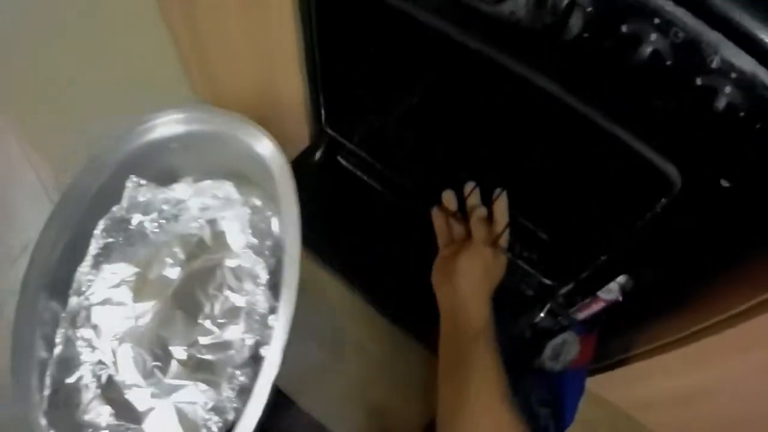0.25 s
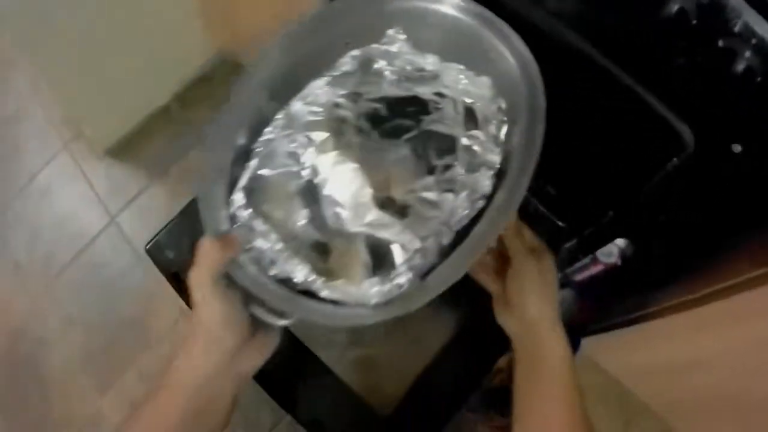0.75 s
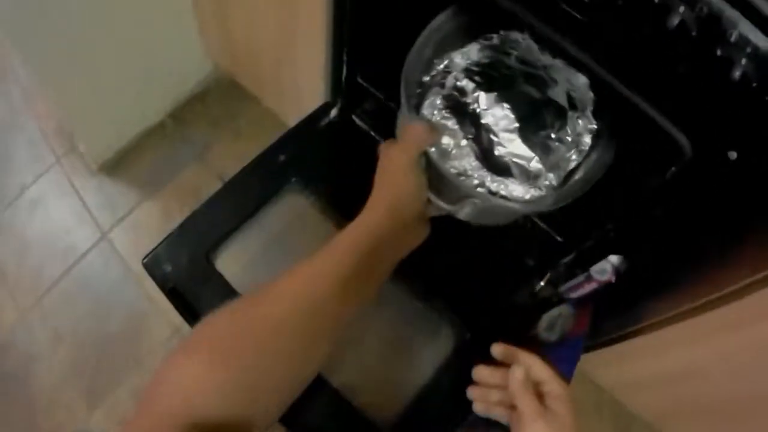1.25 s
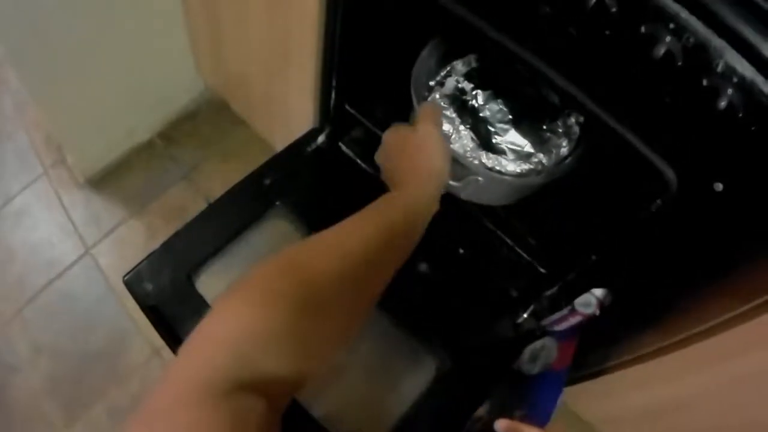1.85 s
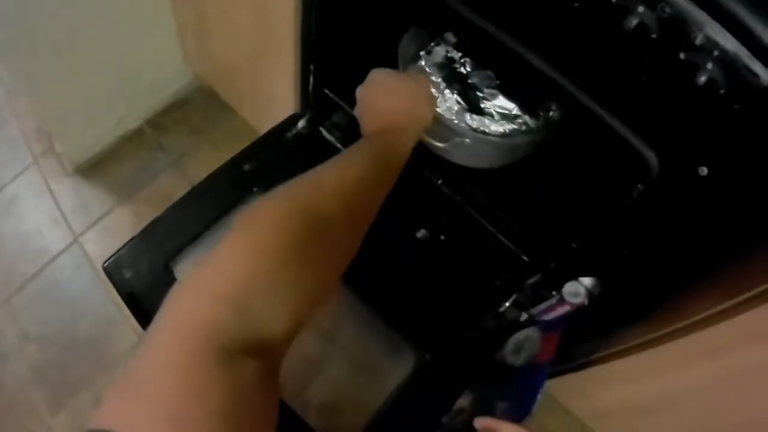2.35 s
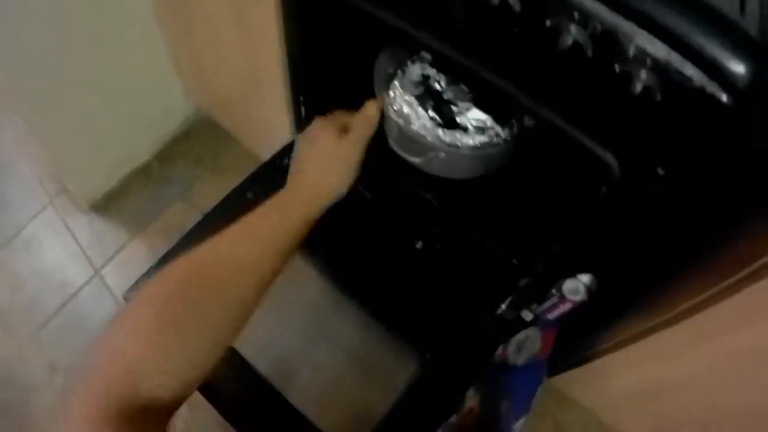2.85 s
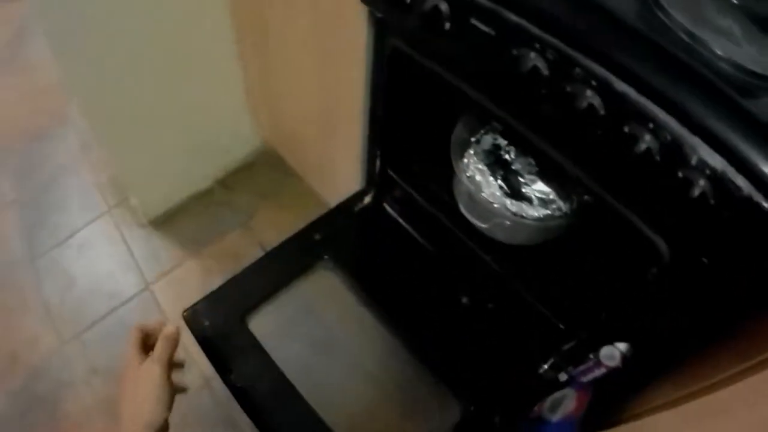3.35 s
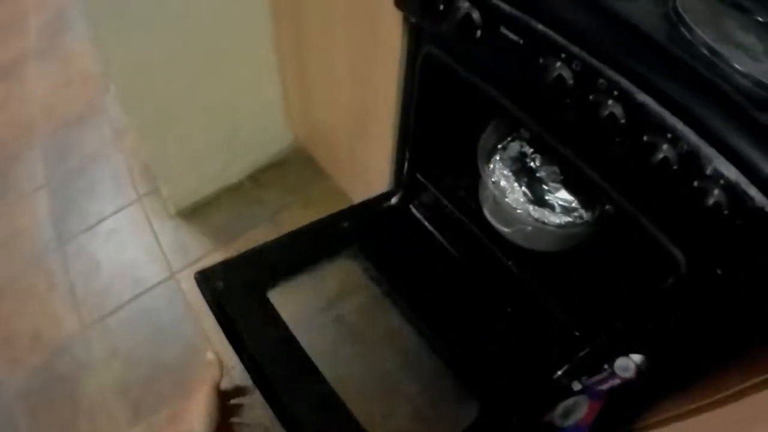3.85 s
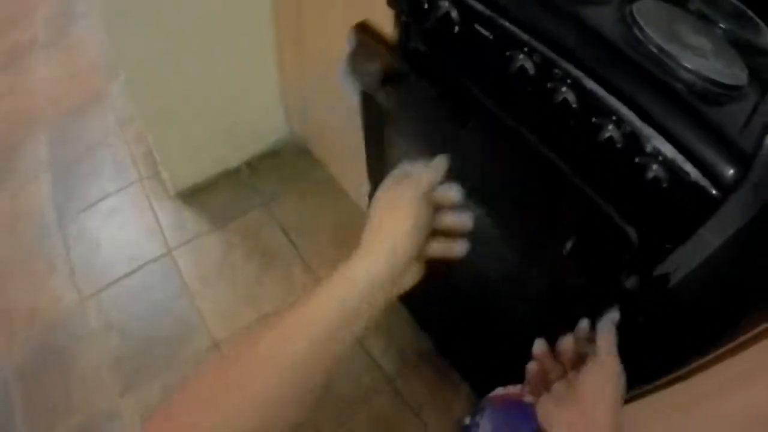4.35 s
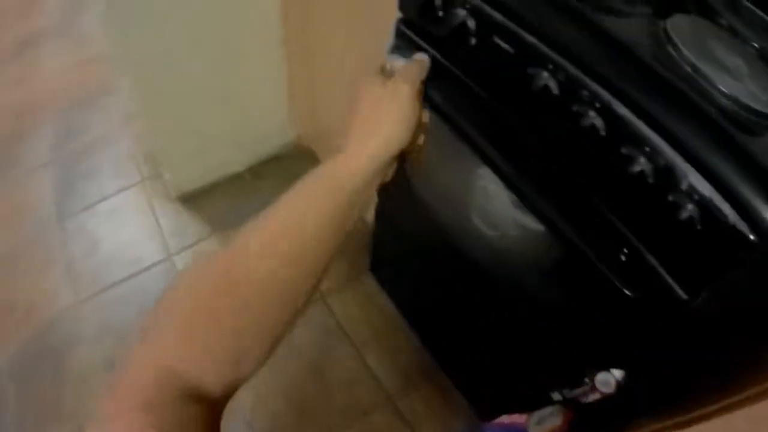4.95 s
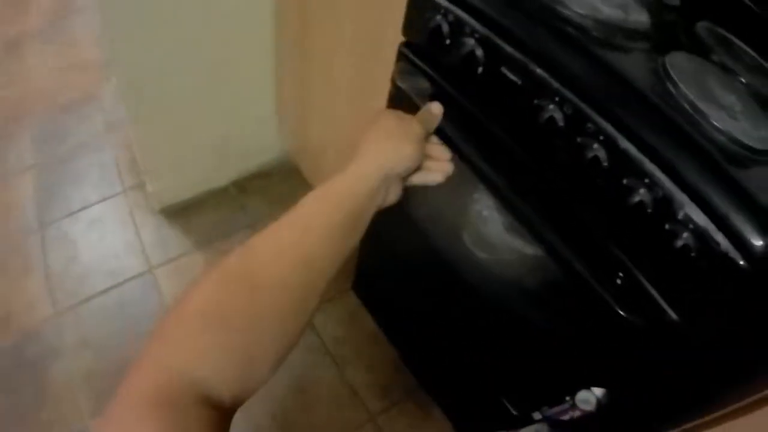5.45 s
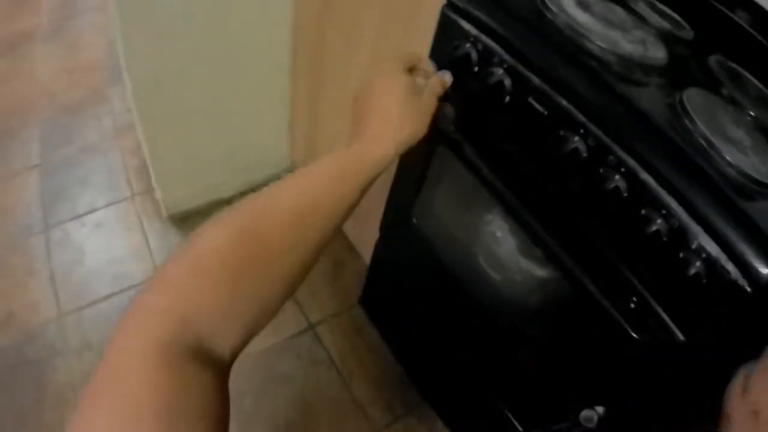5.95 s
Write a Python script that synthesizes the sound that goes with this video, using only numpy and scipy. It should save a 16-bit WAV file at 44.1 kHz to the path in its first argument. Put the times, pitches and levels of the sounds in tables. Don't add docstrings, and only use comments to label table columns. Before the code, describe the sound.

A metal rack clatters to rest, then a thin roasting dish rings as it lands, scraping and bumping against the oven wall. Light taps and a near-quiet gap follow. A high wavering hinge squeak leads into a heavy door slam, by far the loudest sound, with rattling panels and short hard echoes. Small rubs and ticks trail off over room air and faint hum, captured by a small close microphone.

```python
import sys
import numpy as np
from scipy import signal
from scipy.fft import rfft, irfft
from scipy.io import wavfile
from scipy.ndimage import uniform_filter1d

SR = 44100
rng = np.random.default_rng(int(sys.argv[2]) if len(sys.argv) > 2 else 0)


def voltage_ratio(level):
    return 10 ** (np.asarray(level, float) / 20)


def transcribe(signal):
    frames = np.atleast_2d(signal).T
    limited = np.clip(frames, -1, 1)
    pcm = np.round(limited * 32767).astype(np.int16)
    wavfile.write(sys.argv[1], SR, pcm)


N = 273464


def evened(x):
    return x / np.sqrt(np.mean(x ** 2) + 1e-20)


def read(points, hz):
    f, value = np.transpose(points)
    return np.interp(np.log(hz + 1), np.log(f + 1), value)


def add(mix, s, sound):
    part = mix[max(round(s * SR), 0):][:len(sound)]
    part += sound[:len(part)]


def coloured(x, gain):
    return irfft(rfft(x) * gain(np.fft.rfftfreq(len(x), 1 / SR)), len(x))


def resonance(hz, centre_hz, width_hz):
    return 1 / (1 + ((hz - centre_hz) / (width_hz / 2)) ** 2)


def band(hz, centre_hz, octaves):
    return np.exp(-.5 * (np.log2((hz + 1) / centre_hz) / octaves) ** 2)


def wander(count, hz):
    noise = uniform_filter1d(rng.standard_normal(count), 40)
    return evened(signal.lfilter([1], [1, -np.exp(-2 * np.pi * hz / SR)], noise))


def hum():
    # (frequency [Hz], density [dB per Hz])
    air = [(25, 4.5), (50, 2.1), (100, 1), (200, -8.5), (350, -9.5), (550, -5.5), (900, -14.5),
           (1500, -20.5), (2200, -22.5), (4000, -26), (6500, -28), (10000, -27.5), (13500, -24.5),
           (14600, -36.5)]
    # (frequency [Hz], half width [Hz], level [dB])
    drone = [(282, 13, -73.5)]
    out = voltage_ratio(-69.5) * evened(coloured(rng.standard_normal(N), lambda hz: voltage_ratio(read(air, hz))))
    for f, half_width, db in drone:
        line = coloured(rng.standard_normal(N), lambda hz: resonance(hz, f, 2 * half_width))
        out = out + voltage_ratio(db) * evened(line)
    return out


def kitchen(x):
    # (frequency [Hz], t60 [s])
    decay = [(100, 0.29), (400, 0.29), (1500, 0.49), (4000, 0.51), (10000, 0.37)]
    taps = np.zeros(SR)
    at = np.arange(300, SR - 20, 20)
    taps[at + rng.integers(0, 20, len(at))] = rng.choice([-1., 1.], len(at))
    hz, t, z = signal.stft(taps, SR, nperseg=256)
    tail = signal.istft(z * voltage_ratio(-60 * t / read(decay, hz)[:, None]), SR, nperseg=256)[1]
    return signal.fftconvolve(x, tail / np.linalg.norm(tail))[:N]


def rubs():
    # (start [s], length [s], frequency [Hz], width [Hz], level [dB])
    touches = [(0.04, 0.048, 3700, 120, -52), (0.059, 0.059, 1430, 61.7, -44.5), (0.48, 0.3, 142, 91, -65),
               (1.84, 0.44, 138, 58, -61), (1.897, 0.32, 400, 90, -61), (2.1, 0.034, 1110, 91, -48),
               (2.083, 0.046, 4000, 250, -71), (2.853, 0.058, 1740, 514, -63),
               (2.852, 0.068, 4270, 800, -65), (2.95, 0.03, 2230, 900, -58), (2.904, 0.094, 4060, 300, -67),
               (2.922, 0.017, 550, 200, -53), (3.004, 0.12, 1370, 300, -65),
               (3.077, 0.12, 1525, 220, -63.5), (3.08, 0.077, 820, 70, -67), (3.395, 0.05, 1500, 450, -62),
               (4.941, 0.16, 1490, 98.7, -79), (5.035, 0.138, 537.4, 68.6, -69),
               (5.045, 0.2, 4080, 505, -79.5), (5.151, 0.0238, 1575, 301.5, -65.5),
               (2.453, 0.067, 1340, 30, -67), (5.22, 0.012, 3640, 309.7, -77), (5.24, 0.24, 1550, 201, -79),
               (5.477, 0.024, 1500, 295.7, -71)]
    out = np.zeros(N)
    for s, length, hz, width, db in touches:
        noise = rng.standard_normal(16384)
        fuzz = evened(coloured(noise, lambda f: resonance(f, hz, width)))[:round(length * SR)]
        u = np.linspace(0, 1, len(fuzz))
        add(out, s, voltage_ratio(db) * fuzz * 2 * np.sin(np.pi * u ** 0.3))
    return out


def ticks():
    # (time [s], frequency [Hz], level [dB], t60 [s])
    contacts = [(-.0012, 635, -13.5, 0.02), (.043, 2020, -32, 0.044), (.044, 700, -38, .05),
                (.098, 1464, -27.5, .05), (.196, 3720, -50, 0.14), (.198, 3410, -50, 0.15),
                (.27, 2150, -39, .03), (.2702, 945, -24, .025), (.272, 137, -35, 0.16),
                (1.5337, 900, -48, .05), (1.5374, 1100, -39, .05), (1.5443, 1680, -29, 0.015),
                (2.19, 900, -38, .02), (2.232, 1370, -38, 0.056), (2.255, 1300, -46, .04),
                (2.279, 1570, -40, 0.035), (2.342, 628, -30, .03), (2.5, 890, -46, 0.047),
                (2.38, 980, -42, 0.21), (2.395, 1880, -48, 0.38), (2.458, 1355, -49.5, 0.33),
                (2.513, 600, -47, 0.24), (4.036, 429, -37.5, .15), (2.346, 565, -35.5, .06),
                (2.194, 2400, -36, 0.012), (2.55, 1700, -53, .02), (2.558, 1600, -44.5, 0.028),
                (2.8542, 1690, -52, 0.025), (2.8538, 4350, -55, .02), (2.925, 1500, -44, .03),
                (2.9522, 2400, -42, 0.028), (2.968, 1870, -41, .02), (3.0284, 1500, -52, .03),
                (3.085, 1500, -45, .03), (3.1067, 1520, -48, .03), (3.473, 1500, -36.5, 0.023),
                (4.5183, 1500, -9, .02), (4.513, 3400, -45, .03), (4.531, 389, -6.5, 0.051),
                (4.545, 1435, -14, 0.034), (4.744, 1490, -33, 0.044), (4.956, 450, -44, .05),
                (5.0, 1500, -51, .1), (5.045, 550, -51, .04), (5.088, 532, -46.5, 0.035),
                (5.107, 545, -49.5, .05), (5.222, 1050, -57, .04)]
    rise_s = 0.36e-3
    out = np.zeros(N)
    for s, hz, db, t60 in contacts:
        t = np.arange(round(t60 * SR)) / SR - min(s, 0)
        envelope = voltage_ratio(db - 60 * t / t60) * (1 - np.exp(-t / rise_s))
        add(out, s, envelope * np.sin(2 * np.pi * hz * t))
    return out


def slide():
    # (start [s], length [s], level [dB], change over
    # stroke [dB], brightness [dB])
    strokes = [(0.0, 0.238, -35.5, -4.5, -17.5), (0.195, 0.49, -42, -26, -16),
               (0.578, 0.042, -62.5, 3, -29), (1.277, 0.29, -87, 4.5, -4.5),
               (1.624, 0.15, -59.5, -3, -20.5), (1.765, 0.29, -60, 7, -11),
               (2.093, 0.019, -52.5, -1.5, -7.5), (2.14, 0.043, -57, 1, -12), (2.196, 0.22, -45, -4, -12.5),
               (2.361, 0.21, -43.5, -13.5, -19.5), (2.62, 0.268, -71.5, -8, -15),
               (2.924, 0.036, -52.5, -7.5, -4.5), (3.05, 0.37, -59, -11, -11),
               (3.398, 0.05, -58.5, -3.5, -13), (3.487, 0.082, -49, -19, -14), (3.6, 0.63, -78.5, 1, -9.5),
               (4.05, 0.11, -49, -8, -14.5), (4.161, .32, -55.5, 0, -7.5), (4.591, 0.22, -30.5, -13.5, -16),
               (4.945, 0.069, -53, -0.5, -18), (5.041, 0.086, -61.5, 4, -8.5), (5.174, .36, -67, -2, -13)]
    # (frequency [Hz], density [dB per Hz])
    slip_colour = [(50, -1.5), (140, 3), (300, 3.5), (450, -4.5), (700, -4.5), (1100, -10.5), (1800, -11),
                   (2300, -17), (3000, -21.5), (4000, -23.5), (6000, -27), (8500, -30.5), (12000, -32.5),
                   (14500, -38.5)]
    # (frequency [Hz], width [Hz], level [dB])
    body_modes = [(400, 50, 5), (570, 60, 4), (800, 60, 3), (1450, 200, 5), (1800, 150, 4), (2650, 250, 3),
                  (3950, 600, 5)]
    rattle_db, small_modes_db, small_mode_hz = 1.8, 2.5, 22
    rise_db_per_s, fall_db_per_s, rest_db = 599.5, 261, -80.5
    treble_follows, treble_rest_db = 0.691, -89.5
    bass_follows, bass_rest_db, bass_smooth_ms = 0.49, -75, 40
    light_touch = 0.79

    slips = voltage_ratio(1.2 * np.minimum(rng.exponential(1, N), 5))
    slips = slips * (rng.random(N) < 2500 / SR) * rng.choice([-1, 1], N)
    drive = evened(slips) + 0.6 * rng.standard_normal(N)
    drive = drive * voltage_ratio(rattle_db * wander(N, 33))
    small = evened(uniform_filter1d(rng.standard_normal(N // 2 + 1), round(small_mode_hz * N / SR)))

    def colour(hz):
        body_db = sum(db * resonance(hz, f, w) for f, w, db in body_modes)
        return voltage_ratio(read(slip_colour, hz) + small_modes_db * small + body_db)

    def lows(hz, edge_hz):
        return 1 / (1 + (hz / edge_hz) ** 6)

    low = evened(coloured(drive, lambda hz: colour(hz) * lows(hz, 230)))
    mid = evened(coloured(drive, lambda hz: colour(hz) * (1 - lows(hz, 325)) * lows(hz, 2000)))
    high = evened(coloured(drive, lambda hz: colour(hz) * (1 - lows(hz, 2300))))

    t = np.arange(N) / SR
    grid_s = np.arange(0, t[-1], .001)
    s, length, db, change_db, bright_db = np.transpose(strokes)[..., None]
    before, after = np.minimum(grid_s - s, 0), np.maximum(grid_s - s - length, 0)
    edges_db = rise_db_per_s * before - fall_db_per_s * after
    along_db = change_db * np.clip((grid_s - s) / length, 0, 1)
    effort = voltage_ratio(rest_db) + voltage_ratio(db + edges_db + along_db).max(0)
    fizz = voltage_ratio(treble_rest_db) + voltage_ratio(db + bright_db + edges_db + treble_follows * along_db).max(0)
    weight_db = db - light_touch * (bright_db + 14.5) + edges_db + along_db
    weight = voltage_ratio(rest_db) + voltage_ratio(weight_db).max(0)
    rumble = uniform_filter1d((weight / voltage_ratio(rest_db)) ** bass_follows, 1 + bass_smooth_ms)
    rumble = voltage_ratio(bass_rest_db) * rumble
    return sum(x * np.interp(t, grid_s, gain) for x, gain in ((low, rumble), (mid, effort), (high, fizz)))


def strikes(hits, modes, clatter, rise_ms):
    # (frequency [Hz], t60 [s])
    clatter_t60 = [(60, 0.19), (250, 0.18), (1000, 0.14), (4000, 0.074), (12000, 0.18)]
    out, t = np.zeros((2, N)), np.arange(24576) / SR
    hz = np.fft.rfftfreq(len(t), 1 / SR)
    centres = np.geomspace(60, 12000, 8)
    shares = np.array([band(hz, c, .4) for c in centres])
    shares /= shares.sum(0)
    rise = 1 - np.exp(-t[None] / (rise_ms / 1000 + 0.35 / centres[:, None]))
    fade = np.clip((t[-1] - t) / .1, 0, 1)
    for s, db, ring_db, tilt_db, damping in hits:
        noise, luck = rng.standard_normal(len(t)), rng.standard_normal((30, 2))
        gain = voltage_ratio(read(clatter, hz) + tilt_db * np.log2(hz / 700 + .02))
        parts = irfft(rfft(noise) * gain * shares, len(t))
        parts /= np.sqrt(np.mean(parts.sum(0) ** 2))
        decay = voltage_ratio(-60 * damping * t / read(clatter_t60, centres)[:, None])
        dense = (parts * rise * decay).sum(0)
        ring = 0
        for (f, level, t60), (a, b) in zip(modes, luck):
            mode_db = level + 0.24 * a + tilt_db * np.log2(f / 700) - 60 * damping * t / t60
            ring = ring + voltage_ratio(mode_db) * np.sin(2 * np.pi * f * (1 + .0007 * b) * t)
        add(out[0], s, voltage_ratio(db) * dense * fade)
        add(out[1], s, voltage_ratio(db + ring_db) * ring * rise[4] * fade)
    return out


def rack():
    # (time [s], peak [dB], ring of the modes [dB], brightness [dB per octave], damping [factor])
    hits = [
        (0.0, -19, -7, -0.5, 2.53),
        (0.041, -28, -6.5, -2, 0.61),
        (0.094, -35, -20, 0, 0.77),
        (0.2365, -29, 0.5, -2, 0.9),
        (0.2705, -23.5, -10.5, -4, 1.82),
        (3.4745, -35, -20, -1.5, 2.25),
    ]
    # (frequency [Hz], level [dB], t60 [s])
    modes = [(141, -6, 0.32), (517.7, -14, 0.19), (632, 7, 0.07), (735, -10.5, 0.21), (979, -6.5, 0.072),
             (1490, -14, 0.29), (700, 1.5, 0.035)]
    # (frequency [Hz], density [dB per Hz])
    clatter = [(50, -39), (140, -2), (300, -9.5), (450, -4.5), (700, 2), (1100, 1), (1800, -5), (2300, -15),
               (3000, -20), (4000, -20), (6000, -34), (8500, -40.5), (12000, -48.5), (14500, -55)]
    return strikes(hits, modes, clatter, rise_ms=0.72)


def dish():
    # (time [s], peak [dB], ring of the modes [dB], brightness [dB per octave], damping [factor])
    hits = [
        (1.541, -31.5, 3.5, -0.17, 1.01),
        (2.8538, -50.5, -8.5, 2.5, 0.9),
        (2.914, -38.5, -24, 1, 1.62),
        (2.952, -38, -23, -3.3, 1.8),
    ]
    light_hits = [
        (2.099, -46.5, -15, 1.5, 1.5),
        (3.082, -52.5, -12, -1.5, 0.93),
        (3.393, -59, -14, -8, 1.1),
    ]
    # (frequency [Hz], level [dB], t60 [s])
    modes = [(199, -21, 0.5), (396, -10, .24), (411, -7.5, 0.24), (641, -6.5, 0.32), (1071, -5, 0.16),
             (1222, -10, .18), (1631, -12, 0.2), (1720, -17, 0.11), (1868, -14, .4), (2681, -15.5, 0.14),
             (4040, -20, 0.075), (3780, -8, 0.08)]
    # (frequency [Hz], density [dB per Hz])
    clatter = [(50, -14), (140, -11), (300, -8), (450, -3.5), (700, -3), (1100, -1.5), (1800, 0.3),
               (2300, -7.5), (3000, -12), (4000, -12), (6000, -17.5), (8500, -29), (12000, -35),
               (14500, -31)]
    return strikes(hits, modes, clatter, rise_ms=3.9) + strikes(light_hits, modes, clatter, rise_ms=.8)


def oven_wall():
    # (time [s], peak [dB], ring of the modes [dB], brightness [dB per octave], damping [factor])
    shove_hits = [
        (2.193, -24, 2.8, 0.051, 1.5),
    ]
    nudge_hits = [
        (2.3425, -28.5, 5, 1.3, 2.45),
        (2.549, -51, 0.5, 4.5, 5.4),
        (4.036, -40.5, 5.5, 0.3, 0.98),
    ]
    # (frequency [Hz], level [dB], t60 [s])
    shove_modes = [(158, -13, 0.3), (395, -8, 0.75), (404, -8, 0.75), (648, -2.5, 0.14), (1068, -1, 0.075),
                   (1440, -39, 0.36), (1490, 3.5, 0.018), (2000, 1, 0.033), (770, -10, 0.015),
                   (1500, 5, 0.022)]
    nudge_modes = [(454, -1, 0.17), (560, 1.5, 0.16), (782, -3.5, .1), (975, -6.5, 0.087),
                   (1357, -16.5, 0.52), (1564, -5.5, 0.073), (1880, -25.5, 1.2)]
    # (frequency [Hz], density [dB per Hz])
    clatter = [(50, -21.5), (140, -6), (300, 0), (450, -5.5), (700, 2), (1100, -7.5), (1800, -15),
               (2300, -27), (3000, -24.5), (4000, -26.5), (6000, -36), (8500, -40.5), (12000, -40.5),
               (14500, -41)]
    shove = strikes(shove_hits, shove_modes, clatter, rise_ms=3.5)
    return shove + strikes(nudge_hits, nudge_modes, clatter, rise_ms=2.4)


def squeal(hz, partials_db, rough_db=3.2, waver=.0042):
    turn = 2 * np.pi * np.cumsum(hz * (1 + waver * wander(len(hz), 120))) / SR
    tone = 0
    for k, db in enumerate(partials_db):
        tone = tone + voltage_ratio(db + rough_db * wander(len(hz), 40)) * np.sin((k + 1) * turn)
    return np.sqrt(2) * tone * signal.windows.tukey(len(hz), .08)


def hinge():
    # (start [s], length [s], pitch [Hz], pitch arch [Hz], second partial [dB])
    squeals = [
        (4.101, 0.22, 1195, 38, -24),
        (4.13, 0.15, 4260, 39, -28.5),
        (4.184, 0.36, 3992, 100, -25),
        (4.264, .25, 5045, 10, -18),
        (4.269, 0.21, 4140, 15, -27),
    ]
    third_under_db = [-3, -1, -1.5, -32.5, -5]
    # (time [s], level [dB])
    grip_times = [
        [(4.13, -36.5), (4.17, -48), (4.26, -58)],
        [(4.153, -37), (4.178, -39.5)],
        [(4.193, -38), (4.24, -37), (4.278, -42.5), (4.36, -55), (4.424, -58)],
        [(4.283, -52.5), (4.312, -48), (4.332, -49), (4.388, -50), (4.41, -48), (4.436, -46), (4.465, -52),
         (4.492, -49.5)],
        [(4.32, -45), (4.41, -59)],
    ]
    grip_snap = [1, 2.2, 1, 1, 1]
    second_grows_db = [-0.5, 0.5, -0.5, 8, 0]
    # (start [s], length [s], start pitch [Hz], end pitch [Hz], level [dB])
    chirps = [(3.948, 0.046, 1270, 1299, -64.5), (3.983, 0.084, 910, 890, -62),
              (3.966, 0.1, 3180, 3203, -75.5), (4.049, 0.03, 2510, 2630, -46),
              (4.052, 0.047, 4966, 5322, -60.5), (4.07, 0.055, 2590, 2852, -58),
              (4.055, 0.15, 2389, 2104, -60), (4.063, 0.048, 3710, 3890, -57),
              (4.083, 0.067, 4600, 4732, -58.5), (4.09, 0.056, 3450, 3335, -54.5),
              (4.085, 0.028, 7310, 7340, -69), (4.094, 0.052, 6800, 6850, -67),
              (4.113, 0.0197, 5740, 5880, -63), (4.121, 0.052, 5460, 5465, -62.5),
              (4.138, 0.053, 7440, 7450, -66), (4.212, 0.074, 1966, 2000, -56.5),
              (4.43, 0.09, 1900, 1883, -57.5), (4.075, .07, 2720, 2760, -59), (4.1, .06, 2900, 2000, -55.5),
              (4.118, .04, 3400, 3800, -55.5), (4.078, .03, 5300, 5000, -61.5),
              (4.098, .03, 3900, 4250, -60.5), (4.135, .04, 2400, 2400, -59), (4.095, .06, 1600, 1580, -57),
              (4.1, .04, 4300, 4000, -60), (4.3, .12, 1800, 2500, -62)]
    grip_rise_db_per_s, grip_fall_db_per_s, grip_round_s = 450, 300, .014

    out = np.zeros(N)
    shapes = zip(squeals, third_under_db, grip_times, grip_snap, second_grows_db)
    for (s, length, hz, arch_hz, second_db), third_db, grips, snap, grows_db in shapes:
        t = np.arange(0, length, 1 / SR)
        at, grip_db = np.transpose(grips)[..., None]
        late = snap * (s + t - at)
        db = (grip_db + np.minimum(grip_rise_db_per_s * late, -grip_fall_db_per_s * late)).max(0)
        db = uniform_filter1d(db, round(grip_round_s * SR))
        pitch = hz + arch_hz * np.sin(np.pi * t / length)
        partials_db = [db, db + second_db + grows_db * t / length, db + second_db + third_db]
        add(out, s, squeal(pitch, partials_db))
    for s, length, hz, end_hz, db in chirps:
        count = round(length * SR)
        chirp = squeal(np.linspace(hz, end_hz, count), [db], rough_db=4.5, waver=.008)
        add(out, s, chirp * np.hanning(count))
    return out


def door():
    # (time [s], peak [dB], ring of the modes [dB], brightness [dB per octave], damping [factor])
    hits = [
        (4.518, -9, -9, .8, 0.84),
        (4.957, -60, -9, -1, 1.76),
        (5.757, -54, -26, -2.5, 2.5),
        (6.169, -66, -14.5, -2.5, 1.14),
    ]
    # (frequency [Hz], level [dB], t60 [s])
    modes = [(54.3, -3, 0.41), (112.5, -10.5, 0.57), (179.4, -18, 0.68), (330.3, -3.5, 0.31),
             (554, -21.5, 0.86), (648, -6, 0.37), (729, -11, 0.25), (855, 4, 0.12), (422, 1, .25),
             (1357, 4, .09), (1752, -8, .35), (1077, -11.5, 0.51), (1222, -9, 0.2), (1588, -12, 0.23),
             (1750, -24.5, 1), (2570, -12.5, 0.25)]
    # (frequency [Hz], density [dB per Hz])
    clatter = [(50, -9), (140, -2.5), (300, 1), (450, 0.5), (700, -5.5), (1100, -5), (1800, -6),
               (2300, -18), (3000, -19.5), (4000, -20.5), (6000, -34.5), (8500, -45), (12000, -63),
               (14500, -62.5)]
    return strikes(hits, modes, clatter, rise_ms=1)


def scene():
    clatter, tones = rack() + dish() + oven_wall() + door()
    tones = tones + hinge() + rubs() + ticks()
    echoes = kitchen(voltage_ratio(-3) * clatter + voltage_ratio(-12) * tones)
    return (clatter + tones + echoes + slide() + hum())[None]


def thin_treble(x):
    # (from [s], to [s])
    sharp_attacks = [
        (.23, .259),
        (1.525, 1.569),
        (2.182, 2.212),
        (2.343, 2.371),
        (3.463, 3.493),
        (4.04, 4.066),
        (4.488, 4.548),
    ]
    # (time [s], from [Hz], to [Hz])
    hushes = [
        (1.53, 0, 22050),
        (2.175, 2200, 3400),
        (2.843, 3100, 5000),
        (4.508, 400, 4700),
        (4.508, 5500, 22050),
    ]
    hz, t, z = signal.stft(x, SR, nperseg=2048, noverlap=1024)
    power = abs(z) ** 2
    local = uniform_filter1d(power, 31, 0) + 1e-20
    buried_db = 10 * np.log10(power.sum(0) / local)
    coarse = np.clip((buried_db - 38) / 12, 0, 1.3) * np.clip((hz[:, None] - 4500) / 3000, 0, 1)
    calm = np.min(abs(t[:, None] - np.mean(sharp_attacks, 1)), 1) > .035
    z = z * (power > coarse * calm * local)
    x = signal.istft(z, SR, nperseg=2048, noverlap=1024)[1][:N]

    hz, t, z = signal.stft(x, SR, nperseg=256, noverlap=192)
    for s, end in sharp_attacks:
        z[np.ix_(hz > 8700, (t > s) & (t < end))] *= .01
    for s, low_hz, high_hz in hushes:
        z[np.ix_((hz >= low_hz) & (hz <= high_hz), (t > s - .006) & (t < s + .006))] *= .03
    return signal.istft(z, SR, nperseg=256, noverlap=192)[1][:N]


def band_limit(x):
    return signal.sosfilt(signal.butter(12, 14600, fs=SR, output="sos"), x)


def record(dry):
    x = thin_treble(dry[0])[None]
    x = signal.sosfilt(signal.butter(1, 30, "high", fs=SR, output="sos"), x)
    ceiling = .69
    x = x / (1 + (abs(x) / ceiling) ** 12) ** (1 / 12)
    return band_limit(x)


dry = scene()
out = record(dry)
transcribe(out)
```